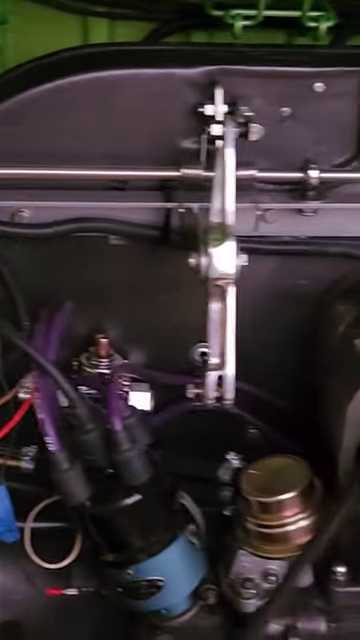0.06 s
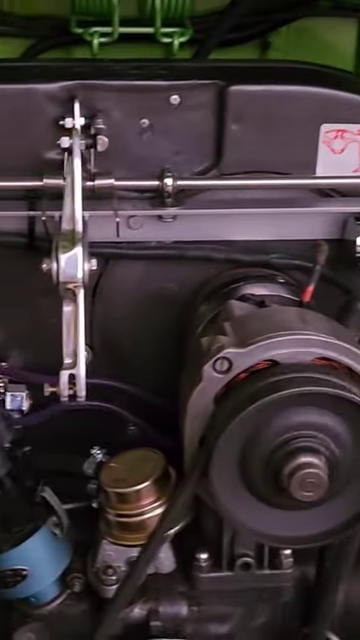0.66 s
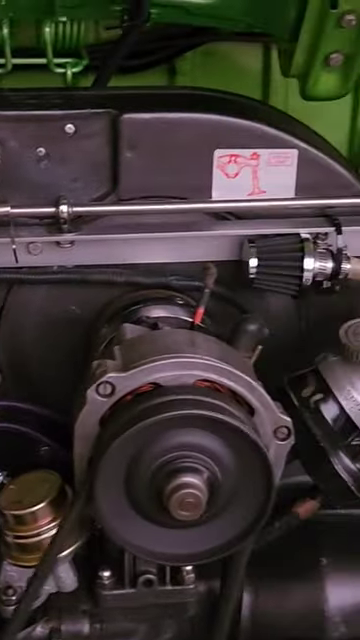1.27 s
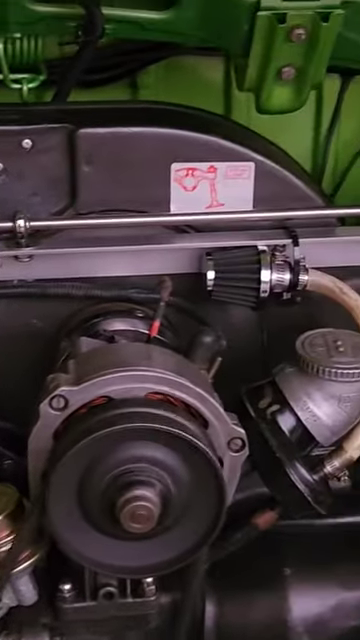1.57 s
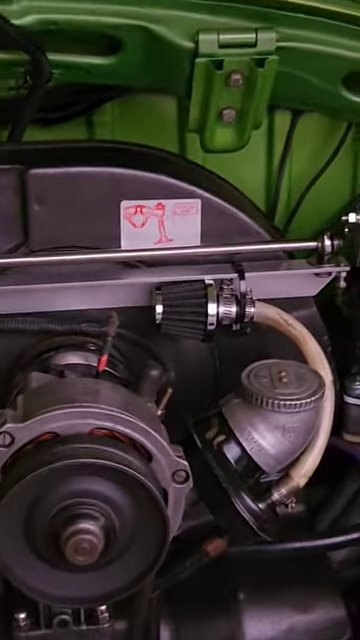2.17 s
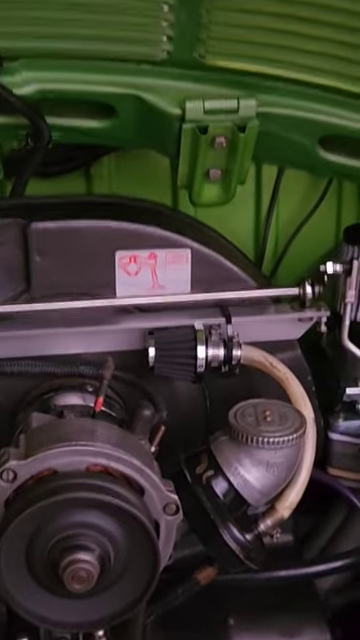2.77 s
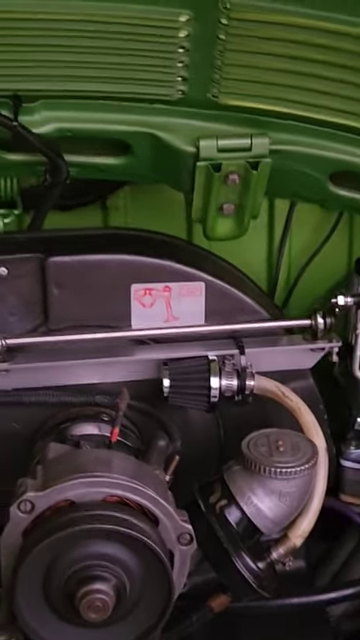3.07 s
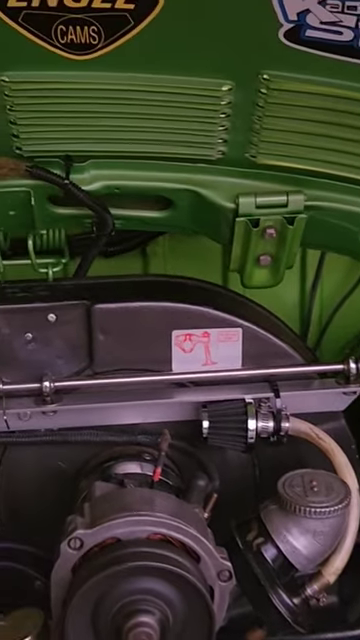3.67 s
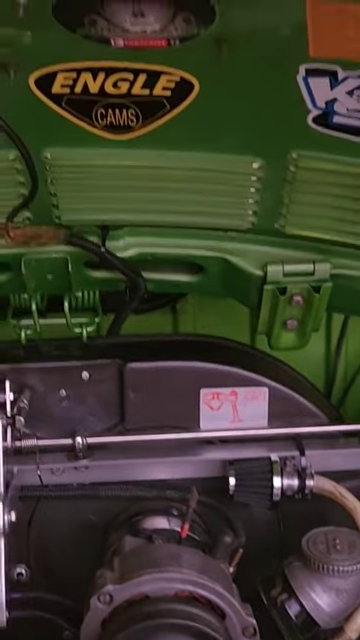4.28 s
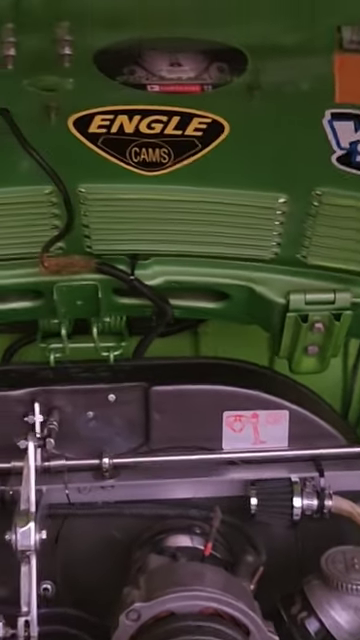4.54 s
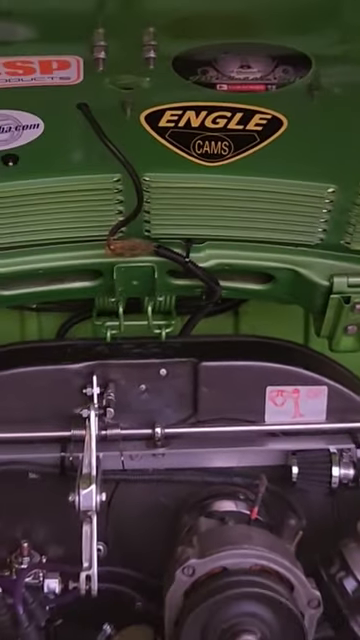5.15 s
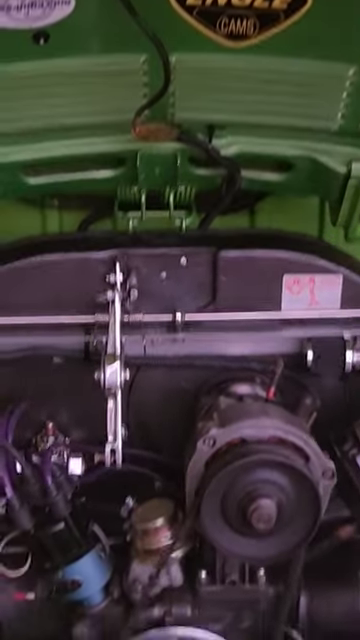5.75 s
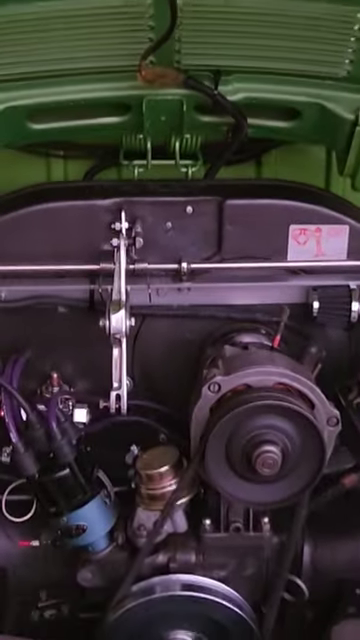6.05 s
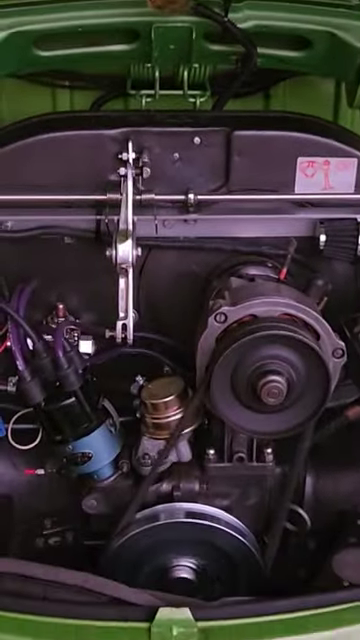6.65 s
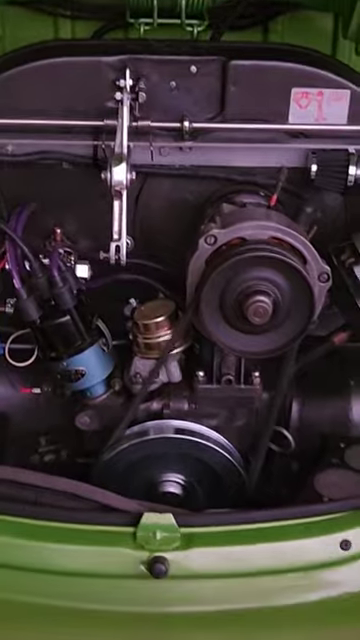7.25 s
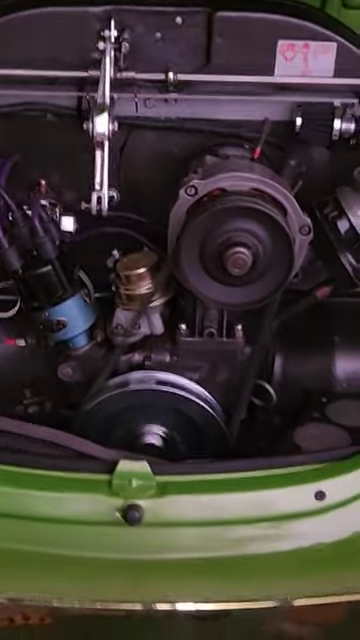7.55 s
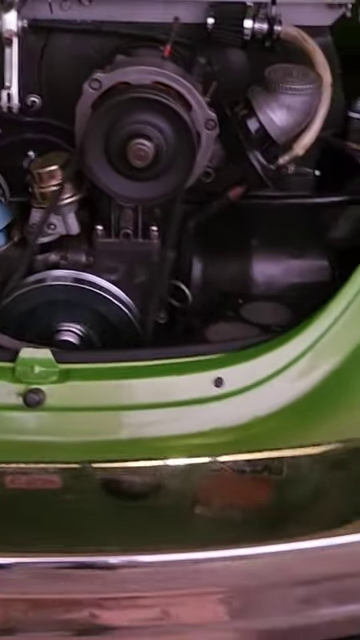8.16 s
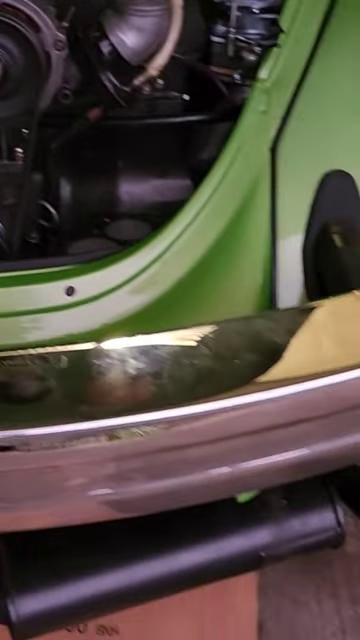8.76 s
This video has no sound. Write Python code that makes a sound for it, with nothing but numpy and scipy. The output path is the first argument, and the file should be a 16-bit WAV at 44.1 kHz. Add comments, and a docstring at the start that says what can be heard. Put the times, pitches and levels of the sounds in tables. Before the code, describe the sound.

Sharp metallic spark ticks repeat quickly over the throbbing idle of a four-cylinder car engine that misfires now and then.

```python
"""A cooling fan rushes and carburettors gulp: an air-cooled flat-four idles at about 980 rpm, lid open,
close to a hand-held pair of microphones. Once every engine cycle a spark arcs and rings the metal
near it with a sharp tick. Each firing drives the resonances of the exhaust with a thump and a chuff,
and valve gear knocks in the case. Now and then a cylinder misses, leaving a hole and a burble."""
import sys
import numpy as np
from scipy import signal
from scipy.fft import rfft, irfft
from scipy.io import wavfile

SR = 44100
rng = np.random.default_rng(int(sys.argv[2]) if len(sys.argv) > 2 else 0)


def to_wav(s):
    """Save 16-bit WAV."""
    ch = np.atleast_2d(s).T  # columns
    pcm = np.round(np.clip(ch, -1, 1) * 32767)  # PCM
    wavfile.write(sys.argv[1], SR, pcm.astype(np.int16))


N = 393372
TIME = np.arange(N) / SR
FREQS = np.fft.rfftfreq(N, 1 / SR)


def gain_of(db):
    """Amplitude ratio of a level in decibels."""
    return 10 ** (np.asarray(db) / 20)


def unit_rms(x):
    """Normalisation to rms 1."""
    return x / np.sqrt(np.mean(x ** 2) + 1e-20)


def spectrum(points):
    """Amplitude response through (Hz, dB) points, interpolated on a log-frequency axis."""
    hz, db = np.transpose(points)
    return gain_of(np.interp(np.log(FREQS + 1), np.log(hz + 1), db))


def follow(points, column=1):
    """Linear interpolation of one column of a time curve at every sample."""
    columns = np.transpose(points)
    return np.interp(TIME, columns[0], columns[column])


def filtered(x, response):
    """Linear filtering: the spectrum is multiplied by a frequency response."""
    return irfft(rfft(x) * response, N)


def mode(hz, width_hz):
    """Response of a damped resonator, gain 1 at its peak."""
    s = 1j * FREQS
    return width_hz * s / (s * s + width_hz * s + hz * hz)


def wander(hz):
    """Random fluctuation of rms 1, low-passed at about the given rate."""
    return unit_rms(filtered(rng.standard_normal(N), np.exp(-(FREQS / hz) ** 2)))


def tone(hz, waver, waver_hz):
    """Frequency modulation: a sine of rms 1 whose pitch wavers by a share of itself."""
    pitch = hz * (1 + waver * wander(waver_hz))
    return np.sqrt(2) * np.sin(2 * np.pi * np.cumsum(pitch) / SR)


def impulses(times, sizes):
    """An impulse train with the given times and sizes."""
    at = np.round(np.ravel(times) * SR).astype(int)
    heard = (at >= 0) & (at < N)
    return np.bincount(at[heard], np.ravel(sizes)[heard], N)


def bursts(times, sizes, shape):
    """Convolution with an impulse train repeats one shape at each of the times."""
    return signal.oaconvolve(impulses(times, sizes), shape / shape.max())[:N]


def swell(length_s):
    """Envelope with a linear rise and a Gaussian fall."""
    u = TIME[:SR // 8] / length_s
    return u * np.exp(-u ** 2)


def tail(rise_s, fall_s):
    """Envelope with a smooth onset and an exponential decay."""
    t = TIME[:SR // 8]
    return (1 - np.exp(-(t / rise_s) ** 2)) * np.exp(-t / fall_s)


# Stereo width of the noise. Each row: frequency in Hz, side minus mid level in dB.
STEREO_WIDTH = [(60, -11), (110, -11), (200, -20.5), (380, -13.5), (700, -5.5), (1290, -1.5), (2380, 1),
                (4400, 0), (8120, 0), (15000, -1)]

def noise_pair():
    """Partial coherence: white noise at two microphones is alike in the bass, unrelated in the treble."""
    mid, side = rng.standard_normal((2, N))
    ratio = spectrum(STEREO_WIDTH)
    side = filtered(side, ratio)
    return filtered(np.array([mid + side, mid - side]), 1 / np.sqrt(1 + ratio ** 2))


# Path of the microphones. Each row: time in seconds, nearness to the engine in dB,
# tilt (0 facing the engine, 1 facing the raised lid).
MIC_PATH = [(0, 2.3, 0.19), (1.0, 1.2, -0.12), (2.7, 1.26, 0.7), (3.6, 0.018, 0.85), (4.9, -0.8, 1),
            (5.9, -1.84, 0.0024), (7.5, -.4, -0.39), (8.9, -0.76, -0.57)]

def pickup(nearness, tilt_db):
    """Distance and direction set a source's gain: it takes its own multiple of the nearness and tilt."""
    return gain_of(nearness * follow(MIC_PATH) + tilt_db * follow(MIC_PATH, column=2))


# Rush of the fan and belt. Each row: frequency in Hz, relative spectral density in dB.
FAN_RUSH = [(300, -15.5), (480, -8.5), (560, 7.5), (660, 2.5), (850, 4), (950, -5), (1250, -12),
            (1500, -2.5), (1720, -12.5), (2100, -0.5), (2600, -20), (5000, -46)]
# Low rush in the fan shroud. Each row: frequency in Hz, relative spectral density in dB.
SHROUD_RUSH = [(15, -10), (28, 3.5), (48, 3.5), (90, 5), (160, -3.5), (250, 0.5), (340, -3.5), (410, -3),
               (470, -10.5), (700, -34)]
# Whine of the blades. Each row: time in seconds, frequency in Hz, level in dB.
BLADE_WHINE = [(0, 752.7, -37.5), (3.5, 754.6, -35), (5.7, 776.8, -37), (8.9, 768, -39.5)]

def fan(rush_db=-32, shroud_db=-31, hollow_db=-39.5, hollow_hz=1125, flutter=0.57):
    """Broadband flow noise fills the shroud and excites a cavity resonance of the bay; the blades whine."""
    rush = gain_of(rush_db) * unit_rms(filtered(noise_pair(), spectrum(FAN_RUSH)))
    shroud = gain_of(shroud_db) * unit_rms(filtered(noise_pair(), spectrum(SHROUD_RUSH)))
    shroud *= pickup(nearness=1.24, tilt_db=0.9)
    hollow = gain_of(hollow_db) * unit_rms(filtered(noise_pair(), mode(hollow_hz, width_hz=210) ** 2))
    hollow *= pickup(nearness=0.99, tilt_db=4.5)
    whine = gain_of(follow(BLADE_WHINE, column=2)) * tone(follow(BLADE_WHINE), waver=0.012, waver_hz=28.1)
    return rush + shroud + hollow + whine * (1 + flutter * wander(hz=21))


def generator(level_db=-43, hum_hz=338):
    """The belt-driven generator hums faintly: one tone under random frequency modulation."""
    hum = tone(hum_hz, waver=0.0245, waver_hz=25.3)
    return gain_of(level_db) * pickup(nearness=2.1, tilt_db=-1.3) * hum


# The slightly hunting idle. Each row: time in seconds, crank speed in rpm.
IDLE_RPM = [(0.0, 982.9), (0.4, 999.4), (0.55, 966.8), (1.2, 950.4), (1.4, 981.7), (2.05, 969.3),
            (2.95, 996.6), (3.5, 957.8), (4.0, 990.3), (4.45, 960.4), (4.8, 985.9), (4.95, 958.1),
            (6.6, 989.4), (7.45, 977.1), (8.05, 1000.4), (8.92, 972.4)]

def cycle_starts(first_s=0.0188, step_s=0.001):
    """Phase is the integral of speed: a new engine cycle starts every two crank turns."""
    t = np.arange(-0.25, N / SR + 0.25, step_s)
    rpm = np.interp(t, *np.transpose(IDLE_RPM))
    cycles = np.cumsum(rpm) * step_s / 120
    cycles -= np.interp(first_s, t, cycles)
    return np.interp(np.arange(-1, int(cycles[-1]) + 1), cycles, t)


def every_cycle(phases):
    """Times (cycles x phases) at which the camshaft passes the given phases."""
    starts = cycle_starts()
    cycles = np.arange(len(starts))
    return np.interp(cycles[:-1, None] + phases, cycles, starts)


# Carburettor gulps. Each row: phase from 0 to 1, half-width in cycles, height over the steady hiss.
INTAKE_GULPS = [(.13, 0.025, 0.21), (.34, 0.081, 0.55), (.56, 0.036, 0.34), (.84, 0.042, 0.16),
                (.96, 0.022, 0.25)]
# Intake hiss. Each row: frequency in Hz, relative spectral density in dB.
INTAKE_HISS = [(900, 6), (2200, 3.5), (3200, 3.5), (4500, 0), (5600, 0.5), (6800, -1.5), (7900, 2.5),
               (9200, -6), (10800, -5), (11900, 0.5), (13200, -5), (14200, -8), (15000, -9.5)]

def intake(level_db=-29.5, uneven=0.25):
    """Amplitude-modulated flow noise: the hiss swells each time a cylinder draws air."""
    starts = cycle_starts()
    cycles = np.interp(TIME, starts, np.arange(len(starts)))
    draw = np.ones(N)
    for phase, width, height in INTAKE_GULPS:
        sizes = height * (1 + uneven * rng.standard_normal(len(starts)))
        draw += sizes[cycles.astype(int)] * np.exp(-((cycles % 1 - phase) / width) ** 2)
    hiss = filtered(noise_pair() * draw, spectrum(INTAKE_HISS))
    return gain_of(level_db) * pickup(nearness=0.92, tilt_db=-1.23) * unit_rms(hiss)


# Near-harmonic partials of the metal by the spark. Each row: frequency in Hz,
# relative left level in dB, relative right level in dB, gain in dB when facing the lid.
METAL_PARTIALS = [(2082, 4, 0.5, 0.5), (3130, -6, -7.5, -4), (4143, -7.5, -9.5, 6), (4870, -21, -14, 10),
                  (5184, -2.5, -0.5, 2), (7310, -0.5, -5, -0.5), (8390, -3, -14, -2), (9350, -11, -22, 0),
                  (10400, -8, -20, 0), (11450, -19, -12, 0), (12600, -18, -7, 2), (13600, -11, -6, 1),
                  (14600, -3, -17, 0)]

def metal_ring(drive, build_periods=2.1, spread_hz=72):
    """Forced vibration: each partial builds up over a few of its own periods, so low ones come last."""
    tilt = follow(MIC_PATH, column=2)
    ring = np.zeros((2, N))
    for hz, left_db, right_db, tilt_db in METAL_PARTIALS:
        decay = np.exp(-hz / (build_periods * SR))
        envelope = signal.lfilter([1 - decay], [1, -decay], drive)
        partial = envelope * gain_of(tilt_db * tilt) * tone(hz, waver=spread_hz / hz, waver_hz=400)
        ring += gain_of([[left_db], [right_db]]) * partial
    ring[1] = np.roll(ring[1], 2)  # it reaches the right microphone a moment later
    return unit_rms(ring)


# Crackle of the arc. Each row: frequency in Hz, relative spectral density in dB.
ARC_CRACKLE = [(700, 7), (1600, -2), (3500, -4), (5000, 7), (6500, 1.5), (7900, 9.5), (9300, 0.5),
               (11000, 1), (12400, 7.5), (15000, -7.5)]
# The microphones drift in and out of the beamed ring. Each row: time in seconds, gain in dB.
RING_BEAM = [(0, 2.5), (0.6, 6), (1.4, 0.5), (2.6, -2.5), (3.4, 3.5), (4.6, 4), (6.2, 2.5), (7.9, -.5),
             (8.9, 1)]

def spark(crackle_db=-36, ring_db=-37, echo_db=-15, linger_db=-45, lead_s=0.0022, grit=0.1, uneven_db=1.13):
    """Transient excitation: a brief arc sputters, echoes in the engine bay and rings the nearby metal."""
    times = cycle_starts() - lead_s
    sizes = gain_of(uneven_db * rng.standard_normal(len(times)))
    arc = bursts(times, sizes, swell(length_s=0.008))
    echo = gain_of(echo_db) * bursts(times, sizes, tail(rise_s=0.015, fall_s=0.012))
    sputter = noise_pair() * np.hypot(arc * np.exp(grit * wander(hz=900)), echo)  # the powers add
    crackle = gain_of(crackle_db) * unit_rms(filtered(sputter, spectrum(ARC_CRACKLE)))
    ring = gain_of(ring_db) * metal_ring(np.hypot(arc, echo))
    # the lowest partial lingers as a light rattle between the ticks
    linger = noise_pair() * bursts(times, sizes, tail(rise_s=0.0061, fall_s=0.047))
    linger = filtered(linger, mode(METAL_PARTIALS[0][0], width_hz=170) ** 2)
    linger *= pickup(nearness=-1.0, tilt_db=1)
    metal = ring + gain_of(linger_db) * unit_rms(linger)
    return pickup(nearness=1.2, tilt_db=-0.5) * (crackle + gain_of(follow(RING_BEAM)) * metal)


# Exhaust strokes of the four cylinders. Each row: phase from 0 to 1, relative strength of the pulse,
# delay of the chuff in seconds, relative level of the chuff in dB.
EXHAUST_STROKES = [(0.015, 1.1, 0.012, -5), (0.266, 0.85, 0.015, -5.5), (0.518, 0.96, 0.00884, -4),
                   (.77, 1.04, .011, -2)]
# Runs of misfires. Each row: approximate start in seconds, number of misses,
# share of the pulse lost (over 1 the cold cylinder sucks gas back).
MISFIRE_RUNS = [(0.2, 1, 1.47), (1.93, 1, 0.54), (2.18, 4, 1.2), (3.4, 3, 1.25), (5.0, 2, 0.88),
                (6.12, 2, 1.17), (6.85, 1, 1.25), (7.21, 2, 0.84), (7.52, 4, 1.47), (7.94, 1, 1.6),
                (8.43, 2, 1.4)]

def firings():
    """Firing times (cycles x cylinders) and shares lost; in a run a cylinder misses every second cycle."""
    times = every_cycle(np.transpose(EXHAUST_STROKES)[0])
    lost = np.zeros(times.shape)
    for start_s, count, share in MISFIRE_RUNS:
        cycle, cylinder = np.unravel_index(np.argmin(abs(times - start_s)), times.shape)
        lost[cycle::2, cylinder][:round(count)] = share
    return times, lost


# Exhaust resonances. Each row: frequency in Hz, bandwidth in Hz, signed weight at the tailpipe.
PIPE_MODES = [(39, 14.8, 2), (62.2, 16.5, -5), (105.3, 17, -1), (131.7, 19.6, 1.93), (163.6, 13, -0.13),
              (196, 24.6, 2.18)]

def exhaust(level_db=-15.5, pulse_s=0.0024, uneven=0.16, jitter_s=0.00048):
    """Pipe resonance: each firing's pressure pulse drives the modes; a misfire leaves a hole in the drone."""
    times, lost = firings()
    sizes = np.transpose(EXHAUST_STROKES)[1] * (1 - lost) * (1 + uneven * rng.standard_normal(times.shape))
    times += jitter_s * rng.standard_normal(times.shape)
    pipes = sum(weight * mode(hz, width) for hz, width, weight in PIPE_MODES)
    smooth_pulse = np.exp(-(np.pi * FREQS * pulse_s) ** 2)
    return gain_of(level_db) * unit_rms(filtered(impulses(times, sizes), pipes * smooth_pulse))


# Knocks of the valve gear. Each row: phase from 0 to 1, relative level in dB.
VALVE_KNOCKS = [(.05, -2.5), (.28, -7), (0.333, -2.5), (.48, -5.5), (.565, -2.5), (.70, -6), (.80, -5.5)]
# Crankcase and tinware resonances. Each row: frequency in Hz, bandwidth in Hz, relative level in dB.
CASE_MODES = [(252, 36, -3.5), (359, 31, -3.5), (619, 106, 0), (831, 73, 4), (1067, 70, -4), (1432, 64, 0)]

def valve_gear(knock_db=-37, rattle_db=-33, uneven_db=1.0, jitter_s=0.00021, oil_cutoff_hz=2400):
    """Impact excitation: each knock rings the modes of the case with a clean blow, then a loose rattle."""
    phases, levels_db = np.transpose(VALVE_KNOCKS)
    times = every_cycle(phases)
    times += jitter_s * rng.standard_normal(times.shape)
    sizes = gain_of(levels_db + uneven_db * rng.standard_normal(times.shape))
    case = sum((-1) ** k * gain_of(db) * mode(hz, width) for k, (hz, width, db) in enumerate(CASE_MODES))
    case /= 1 + (FREQS / oil_cutoff_hz) ** 4  # oil softens the blows
    knocks = gain_of(knock_db) * unit_rms(filtered(impulses(times, sizes), case))
    chatter = noise_pair() * bursts(times, sizes, tail(rise_s=0.0012, fall_s=0.0056))
    rattle = gain_of(rattle_db) * unit_rms(filtered(chatter, case))
    return pickup(nearness=0.15, tilt_db=-0.9) * (knocks + rattle)


# Strength of the chuffs at the microphones. Each row: time in seconds, level in dB.
CHUFF_LEVEL = [(0, -33), (0.7, -29.8), (2.9, -28.5), (5.2, -32.5), (7.9, -31.5), (8.9, -36)]

def chuffs(centre_hz=640, rise_per_s=22, swell_s=0.007, fade_s=0.0031, uneven_db=0.14, jitter_s=0.00026):
    """Just after each pulse the gas gives a rising exponential chirp that swells slower than it stops."""
    phases, _, delays_s, levels_db = np.transpose(EXHAUST_STROKES)
    lead_s = 0.02
    t = TIME[:round(2 * lead_s * SR)] - lead_s  # zero at the envelope's peak
    turns = np.cumsum(centre_hz * np.exp(rise_per_s * t)) / SR
    envelope = np.exp(-(t / np.where(t < 0, swell_s, fade_s)) ** 2)
    chuff = np.sin(2 * np.pi * turns) * envelope
    times = every_cycle(phases) + delays_s - lead_s
    times += jitter_s * rng.standard_normal(times.shape)
    sizes = gain_of(levels_db + uneven_db * rng.standard_normal(times.shape))
    return gain_of(follow(CHUFF_LEVEL)) * unit_rms(bursts(times, sizes, chuff))


def burble(level_db=-34, pitch_hz=92, delay_s=0.01444):
    """A damped resonance sounds briefly as the piston pushes out the unburnt charge after a misfire."""
    times, lost = firings()
    pushes = impulses(times + delay_s, lost)
    return gain_of(level_db) * unit_rms(filtered(pushes, mode(pitch_hz, width_hz=38) ** 2))


def scene():
    """Superposition of all the engine's sources, heard from over the open bay."""
    return exhaust() + burble() + chuffs() + valve_gear() + fan() + generator() + intake() + spark()


# Imbalance of the microphones. Each row: frequency in Hz, left minus right level in dB.
MIC_BALANCE = [(300, -.2), (700, 0), (1200, .7), (1800, .8), (2800, 1.5), (4200, -1), (6400, -2.3),
               (8000, -2.2), (9800, .5), (12000, -5.5), (15000, -1.5)]

def record(dry, cutoff_hz=15350):
    """Frequency response: each microphone has its own colour above the bass, and both are band-limited."""
    balance = spectrum(MIC_BALANCE)
    responses = np.array([balance, np.ones_like(balance)]) * np.sqrt(2 / (1 + balance ** 2))
    lowpass = signal.firwin(301, cutoff_hz, window=("kaiser", 9), fs=SR)
    return signal.oaconvolve(filtered(dry, responses), lowpass[None], "same")


dry = scene()
out = record(dry)
to_wav(out)
```